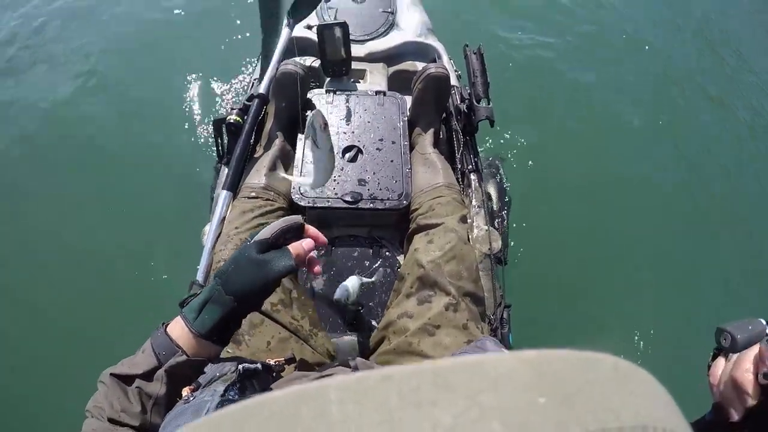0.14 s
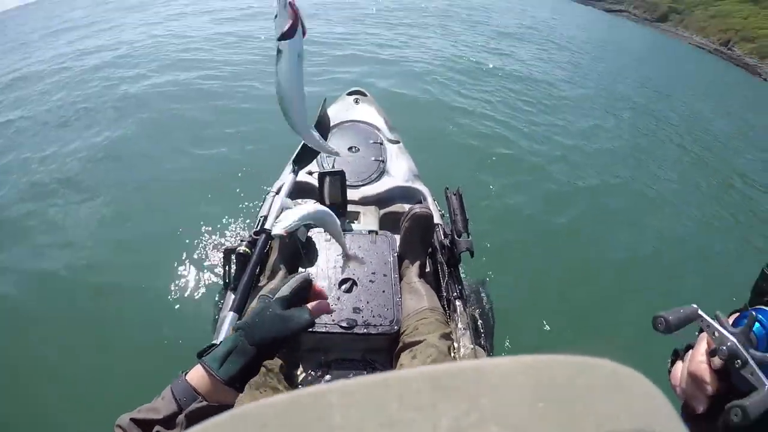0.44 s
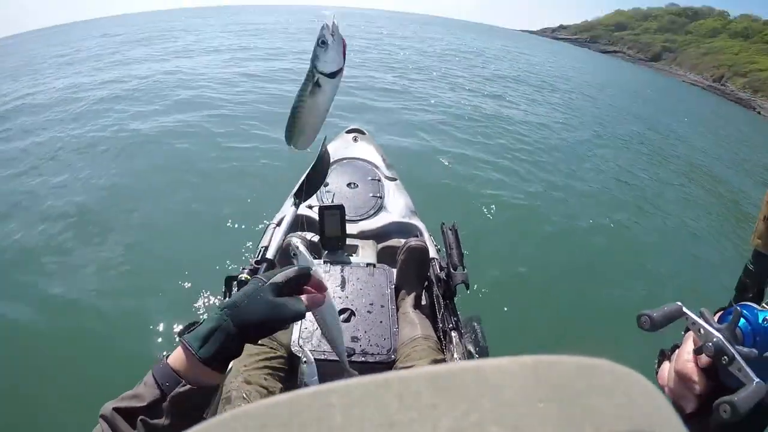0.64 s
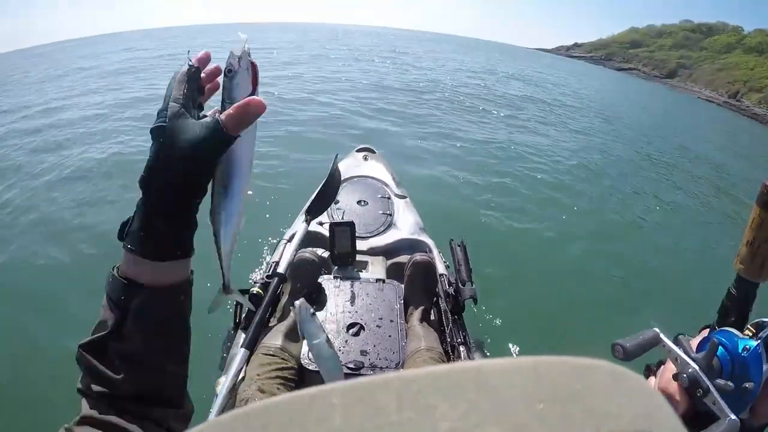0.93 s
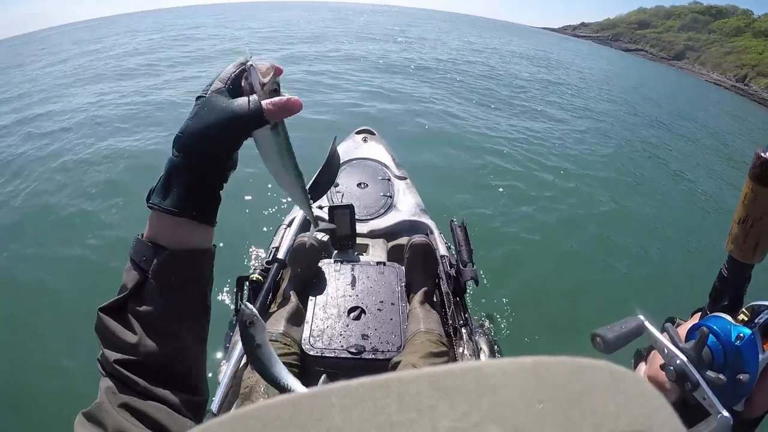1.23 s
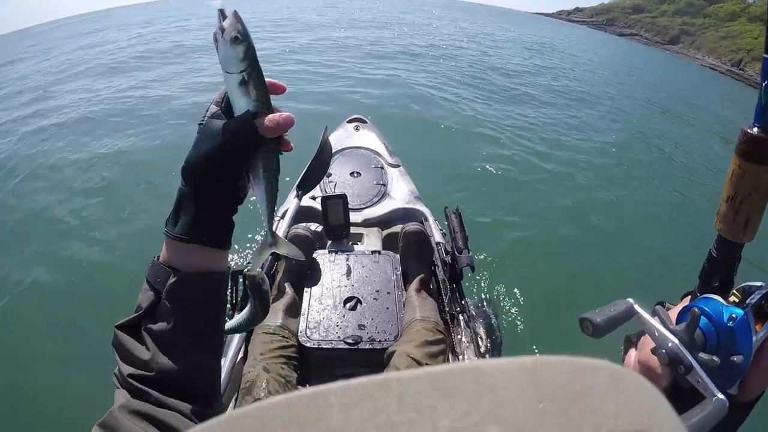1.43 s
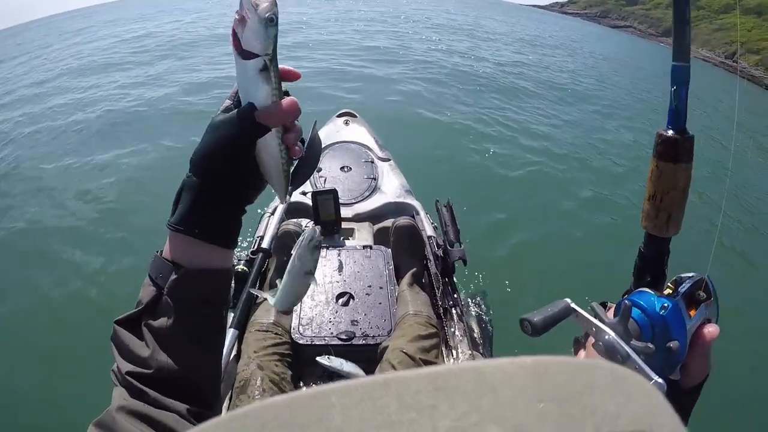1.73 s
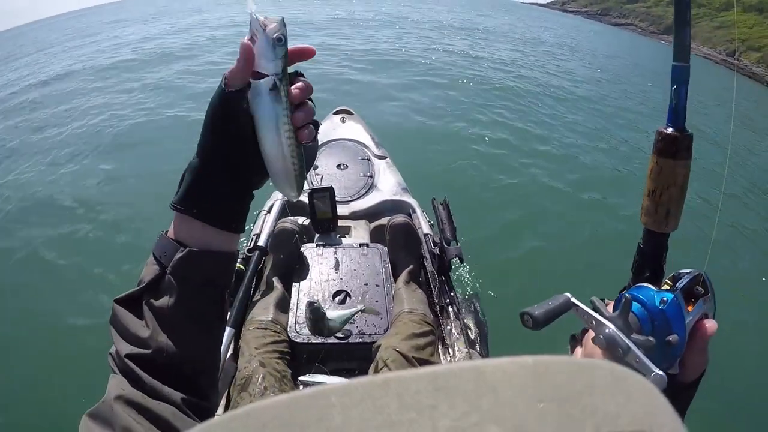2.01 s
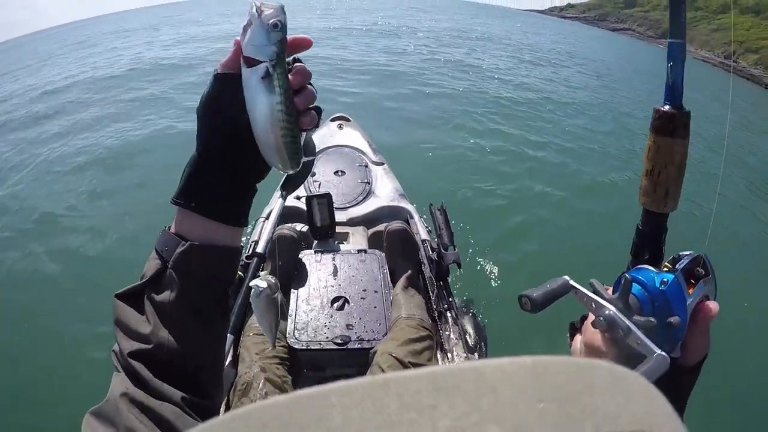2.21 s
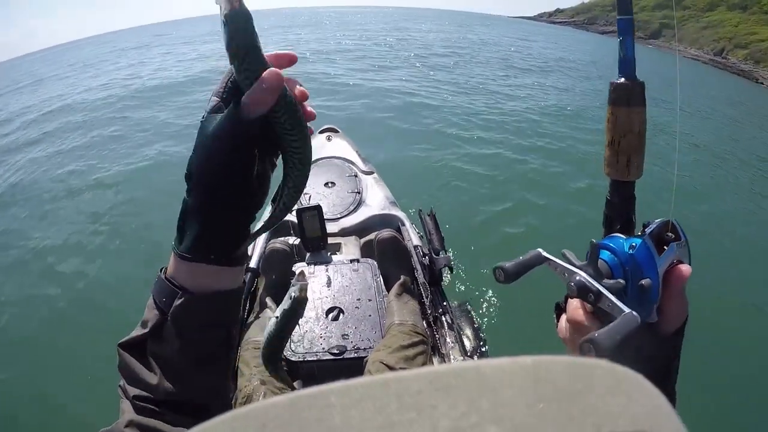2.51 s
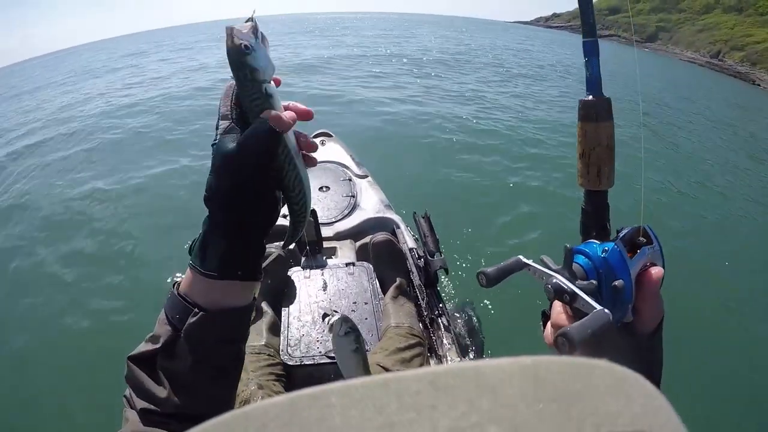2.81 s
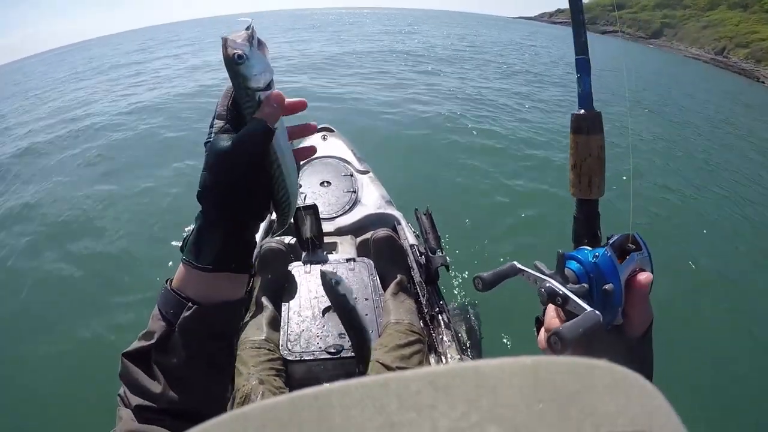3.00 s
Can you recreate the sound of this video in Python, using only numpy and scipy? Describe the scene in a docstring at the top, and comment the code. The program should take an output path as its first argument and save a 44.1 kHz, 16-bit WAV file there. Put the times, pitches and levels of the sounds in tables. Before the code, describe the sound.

Fish flapping hard against a hollow plastic hull, irregular knocks quickening into a rapid steady drumming

```python
"""Fish thrash on the deck of a plastic kayak in the wind, heard by two microphone ports on the head.
From the start wet noise bursts slap and spit, and tail thuds and body flops ring decaying hull modes.
Near 0.6 s a cluster of tackle taps, short noisy ticks, rings narrow resonances; a few more follow later.
From about 2.1 s the heavier thuds come roughly 11 times a second.
Throughout, bands of noise make the wind's buffeting over a faint, watery hiss."""
import sys
import numpy as np
from scipy import signal
from scipy.fft import rfft, irfft
from scipy.io import wavfile
from scipy.ndimage import uniform_filter1d

SR = 44100
rng = np.random.default_rng(int(sys.argv[2]) if len(sys.argv) > 2 else 0)


def dump_mix(stems):
    """Bounce the given channels to the path in sys.argv[1] as a 16-bit WAV at rate SR."""
    frames = np.atleast_2d(stems).T  # one column per channel
    limited = np.clip(frames, -1, 1)  # hard clip at full scale
    pcm = np.round(limited * 32767).astype(np.int16)
    wavfile.write(sys.argv[1], SR, pcm)


def attenuation_scalar(level_db):
    """Turn a level in dB into a linear amplitude multiplier (20 dB per decade)."""
    decades = np.asarray(level_db, float) / 20
    return 10 ** decades


N = 138915  # length in samples


def curve(table, x, col=1):
    """Straight lines between table rows."""
    table = np.array(table, float)
    return np.interp(x, table[:, 0], table[:, col])


def band(x, hz, width_hz):
    """Two-pole resonance that passes one band."""
    return signal.lfilter(*signal.iirpeak(min(hz, .45 * SR), hz / width_hz, fs=SR), x)


def walk(rate_hz):
    """Random levels held for 1 / rate_hz seconds, then smoothed twice."""
    hold = int(SR / rate_hz)
    steps = np.repeat(rng.standard_normal(N // hold + 1), hold)
    return 0.69 * uniform_filter1d(uniform_filter1d(steps, hold), hold)[:N]


def fade(t, t60_s):
    """Exponential decay by 60 dB in t60_s."""
    return np.exp(-np.log(1000) * t / t60_s)


def add(out, start_s, x):
    """Mix x in at start_s, cut off at the end of the scene."""
    i = int(start_s * SR)
    out[i:i + len(x)] += x[:N - i]


# tail blows on the hull: peak_s, peak_db (before the ports), tilt_db_per_octave,
# loss_db (one octave off the middle modes), bounce_db (against the blow), left_minus_right_db (near 280 Hz)
TAIL_BLOWS = [(0.0956, -9.5, -3, 1, -1, -8), (0.166, -21.5, 9, 1, -15, -6),
              (0.2385, -11, -0.5, -0.5, 1, -10.5), (0.3179, -4.5, 3, -0.5, -0.5, -11),
              (0.347, -14, -5, 6, -5, -8), (0.405, -10.5, 5, 0, -8, -10.5),
              (0.5015, -11.5, 14.5, 7.5, -14, -11.5), (0.5633, -14, 1, 0, -5.5, -10),
              (0.6332, -12, 20, -0.5, -23, -8), (0.6645, -9.5, 9.5, 3, 0.5, -10),
              (0.6964, -5, 10.5, 1, -7, -11), (0.7285, -12, -3, -9, 0, -6), (0.793, -15.5, 7, 3, 3.5, -9),
              (0.8382, -11.5, 6, 3, -9, -9), (0.8759, -12, 0, -1, -18, -15),
              (0.9329, -14, 11.5, 3.5, 2.5, -6), (1.0112, -6, 11, 8, -9.5, -12),
              (1.2334, -12.5, -1, -2, -9.5, -10), (1.2632, -10, 5, -1, -17, -11),
              (1.3092, -9, 9, 7, -8, -11.5), (1.4001, -5, 15.5, 13, -7.5, -12),
              (1.5176, -13, 5, -1, -4, -6.5), (1.5898, -13, 13.5, 4, -8.5, -11.5),
              (1.651, -19.5, 0, 3, 2, -5), (1.6855, -4.5, 17, 12.5, -18, -10.5),
              (1.7714, -8, -13, 5.5, -20, -7), (1.8491, -5.5, -5, 9.5, -20, -10.5),
              (1.8807, -16.5, 5, -1.5, -3, -1), (1.9394, -16, -17, -2, -6, 7),
              (1.994, -25.5, -11, -1, -9, 24), (2.0315, -7.5, -0.5, 3, -9, -8),
              (2.0686, -20, 3, -4, -12, 11), (2.129, -2.5, -6, 10.5, -5.5, -9),
              (2.2164, -3.5, 7, 3.5, -8.5, -10), (2.261, -17, -19, 12.5, -2, 5),
              (2.3256, -24, -12, 1, 6, 11), (2.384, -4, -5, 5, -7.5, -11), (2.4719, -2, 6.5, -3, -19, -9),
              (2.5622, -2.5, -1.5, 14, -6.5, -10), (2.6539, -6, -3, 20, -5, -11.5),
              (2.7424, -4.5, -0.5, 4, -26, -11), (2.8332, -2, -4, 13, -15, -9.5),
              (2.9244, -5, 4.5, 3.5, -12, -10), (3.0053, -2, -11.5, 3.5, -10, -10),
              (3.047, -14, 0.5, 3, -22, -9), (3.102, -18.5, 0.5, -1, -13, -1)]
# hull modes: pitch_hz (nominal, varied a little per blow), level_db (relative), t60_s
HULL_MODES = [(170.4, 3, 0.051), (228.4, -0.5, 0.037), (298.5, -2, 0.053), (392.4, -7, 0.045),
              (505.3, -10.5, 0.046), (647, -9.5, 0.046), (759, -11.5, 0.024), (1000, -10, 0.021),
              (1375, -11.5, 0.016)]


def thuds():
    """The deck is pushed in, springs back and is hit again by a bounce; each blow weights the modes anew."""
    PUSH_S, SWELL_S = 0.0004, 0.00055  # the hull takes the blow gradually
    BOUNCE_S = 0.01247  # typical gap, varied per blow
    out, t = np.zeros((2, N)), np.arange(6000) / SR
    hz, mode_db, t60_s = np.array(HULL_MODES).T[:, :, None]
    octaves = np.log2(hz / 290)
    u = np.arange(-100, 100) / (PUSH_S * SR)
    push = u * np.exp(-np.abs(u))
    swell = 1 - np.exp(-t / SWELL_S)
    for peak_s, peak_db, tilt_db, loss_db, bounce_db, pan_db in TAIL_BLOWS:
        level_chance, pitch_chance = rng.standard_normal((2, len(HULL_MODES), 1))
        blow_db = tilt_db * octaves - loss_db * np.minimum(octaves ** 2, 1.5)
        gain = attenuation_scalar(mode_db + 2.0 * level_chance + blow_db)
        tones = np.sin(2 * np.pi * hz * (1 + .03 * pitch_chance) * t)
        ring = swell * np.sum(gain * fade(t, t60_s) * tones, axis=0)
        ring = np.convolve(ring, push)
        ring = attenuation_scalar(peak_db) * ring / ring.max()
        start_s = peak_s - ring[:400].argmax() / SR
        bounce_s = start_s + BOUNCE_S * (1 + 0.069 * rng.standard_normal())
        lean_db = (pan_db - curve(PORT_DB, 280)) / 2  # the ports add the rest of the pan
        for side, side_db in zip(out, (lean_db, -lean_db)):
            add(side, start_s, attenuation_scalar(side_db) * ring)
            add(side, bounce_s, attenuation_scalar(side_db + bounce_db) * ring)
    return out


# heavy body flops: start_s, level_db (relative), pitch_hz
BODY_FLOPS = [(0.075, -27, 60.6), (0.202, -11, 64.5), (0.386, -13, 57), (0.513, -9, 81), (0.591, -5.5, 76),
              (0.683, -9, 93), (0.78, -5.5, 71.6), (0.863, -5.5, 61.6), (0.963, -7.5, 74), (1.118, -10, 62),
              (1.304, -11.5, 92), (1.51, -25, 79.4), (1.609, -9.5, 70), (1.837, -17, 74.7),
              (1.923, -23, 67.3), (2.123, -8.5, 89.7), (2.325, -9, 73.7), (2.46, -26, 90), (2.568, -21, 78),
              (2.824, -26.5, 64.5), (2.989, -18, 72.7)]


def booms():
    """Slow pushes swell the hull's deepest mode, a decaying sine."""
    T60_S, RISE_S, BOOM_DB = 0.1, 0.015, 7.5
    out, t = np.zeros(N), np.arange(12000) / SR
    swell = (1 - np.exp(-t / RISE_S)) * fade(t, T60_S)
    for start_s, level_db, pitch_hz in BODY_FLOPS:
        add(out, start_s, attenuation_scalar(level_db + BOOM_DB) * swell * np.sin(2 * np.pi * pitch_hz * t))
    return out


# wet slaps: start_s, level_db (relative), low_db (two lowest bands), top_db (two highest bands),
# t60_s (at least 0.005 is played)
WET_SLAPS = [(0.0024, -22.5, -3, -7.5, 0.05), (0.031, -33, -8, -12, 0.031),
             (0.0801, -23, -3.5, -3.5, 0.034), (0.1602, -30.5, 5.5, -5.5, 0.034), (0.2, -38, 5, -10, 0.032),
             (0.2392, -33.5, -11.5, -4, 0.035), (0.31, -36, 3, -10, 0.038), (0.3996, -30, 6.5, -3, 0.039),
             (0.4484, -26, -14, -16, 0.02), (0.4924, -29, 4, -10, 0.051), (0.579, -33, -12, -7, 0.041),
             (0.597, -27.5, 12, -9, 0.025), (0.6169, -18, -3, -11, 0.0099), (0.625, -33, 12, -24, 0.031),
             (0.662, -21.5, -7, -4, 0.022), (0.686, -27, 1.5, -19, 0.043), (0.72, -41, 21, -13, 0.015),
             (0.7515, -29, -1, -3.5, 0.037), (0.7818, -31.5, 2.5, -11, 0.044),
             (0.828, -42.5, 19, -19, 0.053), (0.8712, -37.5, 7.5, -7.5, 0.028),
             (0.928, -31, 5.5, -11, 0.045), (1.005, -24.5, 6, -6, 0.032), (1.055, -36.5, 6, -10, 0.024),
             (1.0946, -29, 1.5, -7, 0.026), (1.113, -29, -8, -9, 0.039), (1.2174, -28, -2.5, -21, 0.075),
             (1.2355, -30.5, -3, -16.5, 0.021), (1.304, -45, 14, -1, 0.033), (1.3304, -16, -4, -2, 0.027),
             (1.348, -35, -13, -8, 0.026), (1.396, -23, 0, -8.5, 0.019), (1.499, -37.5, -13, -10, 0.027),
             (1.512, -38, 8, -5.5, 0.032), (1.5863, -29.5, 4.5, -5, 0.024), (1.6107, -24, -6, -17.5, 0.028),
             (1.645, -32, 9.5, -23, 0.021), (1.662, -30, 1, -14, 0.017), (1.6821, -29, 9, -10, 0.017),
             (1.7732, -32, -1, -17, 0.042), (1.847, -28.5, 4.5, -4.5, 0.034),
             (1.8774, -29.5, 5, -22, 0.027), (1.971, -30, 8.5, -16, 0.032), (2.006, -29, -4, -14, 0.027),
             (2.0306, -34, -5, -3, 0.028), (2.0637, -28, 2.5, -13.5, 0.037), (2.126, -28, 2, 0, 0.03),
             (2.2132, -37.5, 14.5, -1, 0.033), (2.241, -35.5, 3, -11, 0.037), (2.292, -34, 13.5, -4, 0.015),
             (2.379, -31.5, 11.5, 0.5, 0.027), (2.4674, -29, 2, -10, 0.028), (2.5575, -24, 0.5, -4, 0.026),
             (2.581, -28, 2.5, -21, 0.035), (2.6497, -34.5, 8, -7.5, 0.043), (2.6778, -37.5, 2, -11, 0.038),
             (2.721, -26, -17, -11, 0.021), (2.7387, -27.5, 5, 1.5, 0.022), (2.77, -31.5, -9, -16, 0.04),
             (2.829, -31.5, 7, -3.5, 0.052), (2.8593, -29, 4.5, -24, 0.043), (2.919, -23, 2.5, -7, 0.023),
             (2.951, -25, -5, -38, 0.033), (3.0023, -17.5, -2, -8, 0.022), (3.037, -20, 1.5, -15.5, 0.026)]
# slap bands: centre_hz, width_hz (before the filters are cascaded), level_db (relative)
WET_BANDS = [(794, 670, -5.5), (1630, 1100, -16), (3710, 1620, -15), (7810, 6200, -5), (12000, 18000, -21)]


def slap_shape(t, t60_s):
    """Quick rise, a short hold in proportion to the fade, then the fade."""
    RISE_S = 0.0018
    hold_s = 0.0032 * t60_s / 0.033  # counted from the start, so it can end within the rise
    return np.minimum(t / RISE_S, 1) * fade((t - hold_s).clip(0), max(t60_s, .005))


def slaps():
    """Wet skin spatters as bursts of spiky noise in five bands, with weak flicks at random times."""
    FLICKS_PER_S, FLICK_T60_S = 45, 0.051
    FLICK_DB, FLICK_SPREAD_DB = -58, 2.5  # base level, mean of the random lift above it
    env, t = np.zeros((5, N)), np.arange(5000) / SR
    for start_s, level_db, low_db, top_db, t60_s in WET_SLAPS:
        shape = slap_shape(t, t60_s)
        for band_env, part_db in zip(env, (low_db, low_db, 0, top_db, top_db)):
            add(band_env, start_s, attenuation_scalar(level_db + part_db) * shape)

    flick_shape = slap_shape(t, FLICK_T60_S)
    for when, luck, *tints in rng.random((int(FLICKS_PER_S * N / SR), 7)):
        flick_db = FLICK_DB - FLICK_SPREAD_DB * np.log(luck)
        for band_env, tint, part_db in zip(env, tints, (12.5, 12.5, 0, -10, -10)):
            add(band_env, when * N / SR, attenuation_scalar(flick_db + part_db + 11 * (tint - .5)) * flick_shape)

    # a random level on every sample makes the noise spit
    spit = rng.standard_normal((5, N)) * attenuation_scalar(7.2 * rng.standard_normal((5, N)))
    out = np.zeros(N)
    for noise, band_env, (hz, width_hz, level_db) in zip(spit, env, WET_BANDS):
        part = band(band(noise, hz, width_hz), hz, 1.2 * width_hz)
        out += attenuation_scalar(level_db) * band_env * part / part.std()
    return out


# tackle taps: start_s, peak_db (before the ports), pitch_hz, width_hz (of each of two filters),
# t60_s (of the noise that drives them)
TACKLE_TAPS = [(.599, -18.5, 1860, 1190, 0.024), (.6035, -15.5, 1690, 890, 0.023),
               (0.6225, -16.5, 1700, 880, 0.039), (.629, -20, 750, 495, .03),
               (.6385, -30, 2050, 400, 0.018), (0.644, -33, 1840, 400, 0.018),
               (.693, -22.5, 2050, 500, 0.028), (.829, -30, 1850, 680, 0.039),
               (0.669, -28, 1200, 400, .035), (.721, -28, 1000, 700, 0.027), (.931, -22, 1000, 600, 0.057),
               (2.56, -23, 940, 400, .035), (2.741, -22, 900, 497, .03), (1.725, -46, 1880, 400, .015),
               (1.783, -21, 2080, 450, 0.0092), (1.877, -26.5, 1350, 600, 0.026),
               (2.467, -27, 1530, 400, 0.016), (2.866, -29, 810, 300, 0.04)]


def taps():
    """A short noisy tick, quick to rise and dying away, rings one narrow resonance."""
    RISE_S = 0.0012
    out, t = np.zeros(N), np.arange(3000) / SR
    for start_s, peak_db, hz, width_hz, t60_s in TACKLE_TAPS:
        tick = rng.standard_normal(3000) * np.minimum(t / RISE_S, 1) * fade(t, t60_s)
        ring = band(band(tick, hz, width_hz), hz, width_hz)
        add(out, start_s, attenuation_scalar(peak_db) * ring / np.abs(ring).max())
    return out


# level between the ports: freq_hz, left_minus_right_db
PORT_DB = [(60, -1), (200, -5), (400, -13), (700, -6), (1000, -1), (1500, 0), (2200, 7), (3000, 0),
           (4000, 0), (7000, -6), (10000, -2), (12000, -1)]
# phase between the ports: freq_hz, left_lead_rad
PORT_PHASE = [(0, 0), (400, .3), (700, 1.8), (2200, 2.1), (3000, 0), (5000, 0), (8000, 1.1), (10000, .3),
              (12000, 0)]


def ports(x):
    """The two ports colour the hits apart; each also gets its own short treble scatter off the deck."""
    SCATTER_DB, SCATTER_T60_S = -4.5, 0.011
    hz = np.fft.rfftfreq(N, 1 / SR)
    tint = attenuation_scalar(curve(PORT_DB, hz) / 2) * np.exp(.5j * curve(PORT_PHASE, hz))
    pair = irfft(rfft(x) * np.array([tint, 1 / tint]), N)
    tail = rng.standard_normal((2, 3000)) * fade(np.arange(3000) / SR, SCATTER_T60_S)
    tail = tail / np.sqrt(np.sum(tail ** 2, axis=1, keepdims=True))
    tail = signal.lfilter(*signal.butter(2, 3000, "high", fs=SR), tail)
    return pair + attenuation_scalar(SCATTER_DB) * signal.fftconvolve(pair, tail, axes=1)[:, :N]


# wind spectrum: freq_hz, density_db (per Hz, relative)
WIND_SPECTRUM = [(12, -34), (20, -5), (76, -2.5), (170, -11), (225, -16.5), (289, -11.5), (477, -28.5),
                 (766, -34.5), (931, -36.5), (2910, -59.5), (9380, -62), (12700, -83), (15500, -100)]
# gusts: time_s, rumble_db (relative), low_mids_db (relative), left_minus_right_db (of the rumble)
GUSTS = [(0.0, -29, -31, -3), (0.19, -24.5, -32.5, -11), (0.23, -24, -35.5, -3.5), (0.75, -26, -29, -8.5),
         (1.1, -25, -37, -4), (1.21, -20, -33.5, 4), (1.25, -23.5, -32.5, -8), (1.32, -19, -29.5, 10),
         (1.43, -22, -33.5, 0.5), (2.17, -24, -36.5, 9), (3.07, -27.5, -38, -3.5), (3.15, -30.5, -35, -2)]
# likeness of the ports: freq_hz, likeness (-1 opposite to 1 alike)
PORT_LIKENESS = [(60, 0.42), (130, 0.46), (290, 0.6), (640, -0.18), (1410, -0.31), (3100, 0.37),
                 (6820, 0.04), (15000, 0.17)]


def wind():
    """Third-octave noise: gusts drive the rumble and low mids over steady hiss; ports partly alike."""
    RUMBLE_DB, MIDS_DB, HISS_DB = -1, 4, -21.5  # offsets of the three ranges
    out, t = np.zeros((2, N)), np.arange(N) / SR
    lumps = walk(24)  # flutter shared by all bands
    rumble_db, mids_db, rumble_pan_db = (curve(GUSTS, t, col) for col in (1, 2, 3))
    log_spectrum = [(np.log(f), db) for f, db in WIND_SPECTRUM]
    for hz in 22 * 2 ** (np.arange(29) / 3):
        mid, side = (band(band(rng.standard_normal(N), hz, hz / 3), hz, hz / 2) for _ in range(2))
        like = np.clip(curve(PORT_LIKENESS, hz), -.95, .95)
        pair = np.sqrt(1 + like) * mid + np.sqrt(1 - like) * side * np.array([[1], [-1]])

        # shares of rumble and hiss in this band; the rest is low mids
        bass = np.clip(np.log2(220 / hz), 0, 1)
        treble = np.clip(np.log2(hz / 700), 0, 1)
        level_db = bass * (RUMBLE_DB + rumble_db) + treble * HISS_DB
        level_db = level_db + (1 - bass - treble) * (MIDS_DB + mids_db)
        flutter_db = 3.7 * walk(12) + np.interp(hz, [60, 200, 3000], [.5, 3., 1.5]) * lumps
        db = curve(log_spectrum, np.log(hz)) + level_db + flutter_db
        pan_db = (1 - bass) * curve(PORT_DB, hz) + bass * rumble_pan_db
        pan = attenuation_scalar(pan_db * np.array([[.5], [-.5]]))
        out += attenuation_scalar(db) * pan * pair * 30
    return out


def scene():
    """Hits through the ports, over the wind."""
    return ports(thuds() + booms() + slaps() + taps()) + wind()


def roll_off(x):
    """The treble ends steeply here."""
    return signal.sosfilt(signal.butter(12, 15630, fs=SR, output="sos"), x)


def record(dry):
    """The input stage rounds the peaks and cuts the top."""
    rounded = np.tanh(0.51 * dry) / 0.68
    top_cut = signal.cheby2(10, 50, 15700, fs=SR, output="sos")
    mix = signal.sosfilt(top_cut, rounded)
    return roll_off(mix)


dry = scene()
out = record(dry)
dump_mix(out)
```